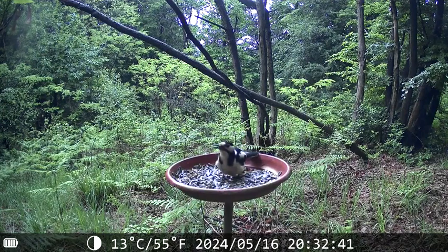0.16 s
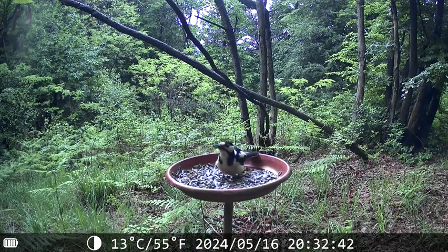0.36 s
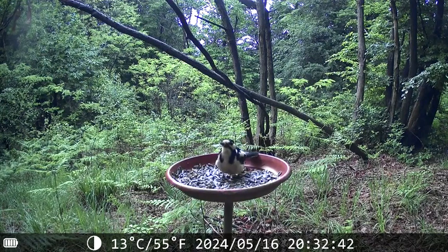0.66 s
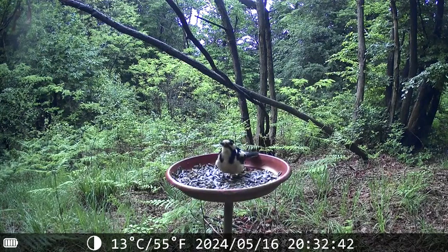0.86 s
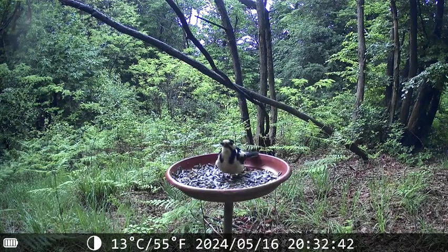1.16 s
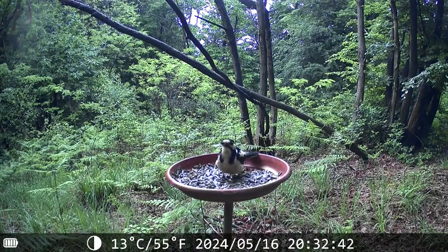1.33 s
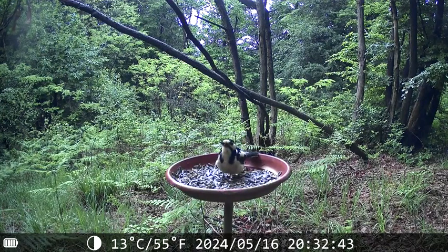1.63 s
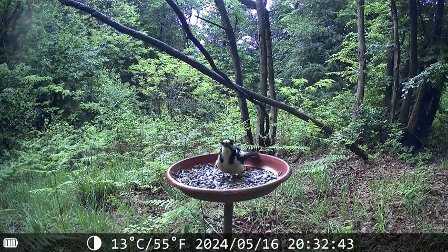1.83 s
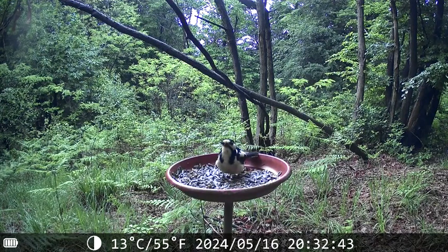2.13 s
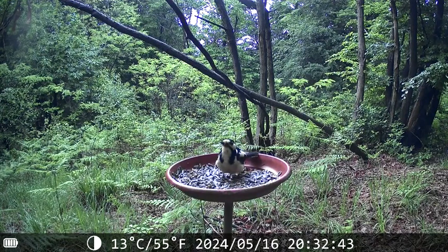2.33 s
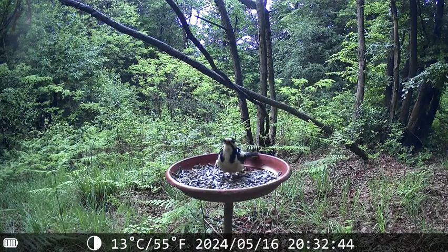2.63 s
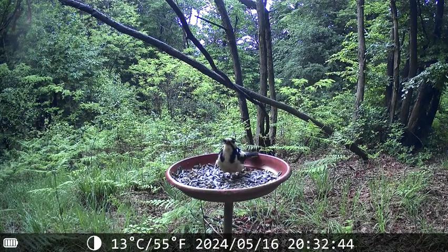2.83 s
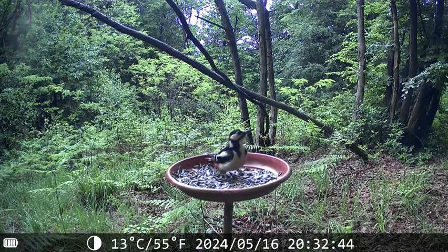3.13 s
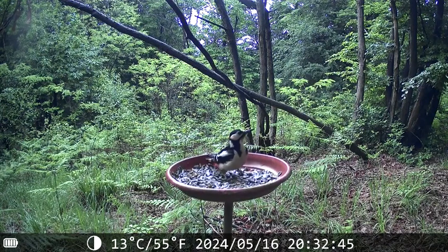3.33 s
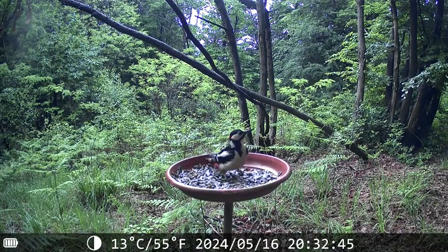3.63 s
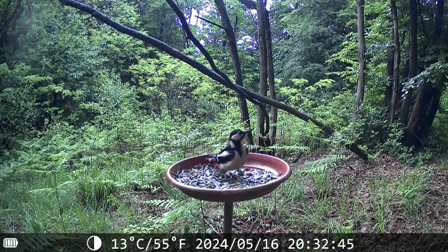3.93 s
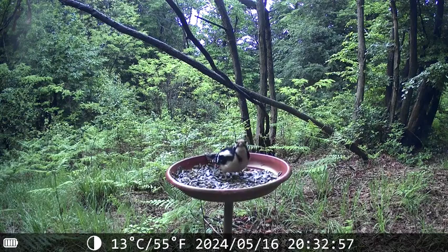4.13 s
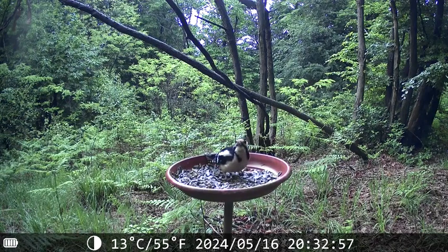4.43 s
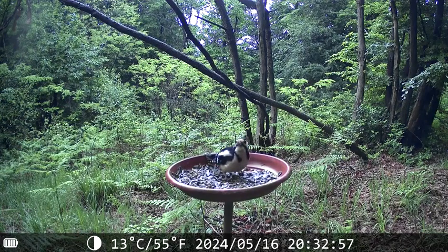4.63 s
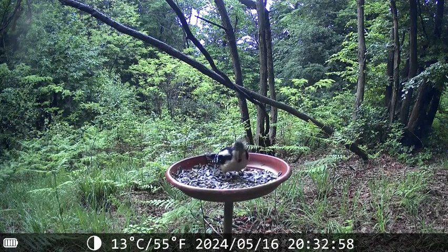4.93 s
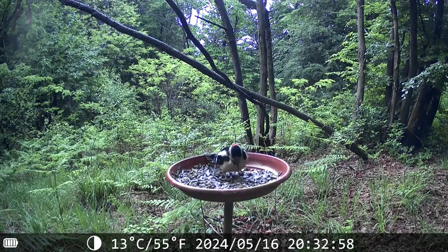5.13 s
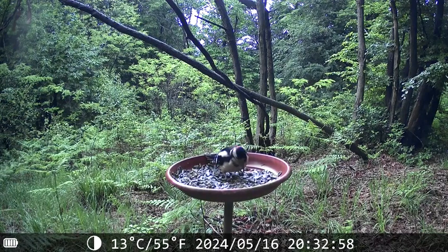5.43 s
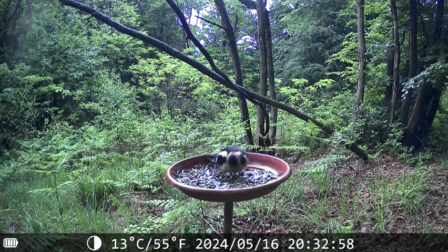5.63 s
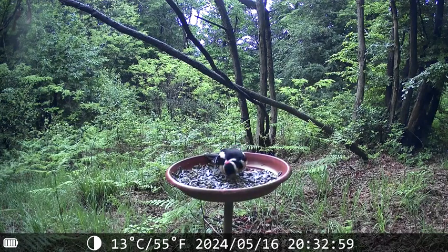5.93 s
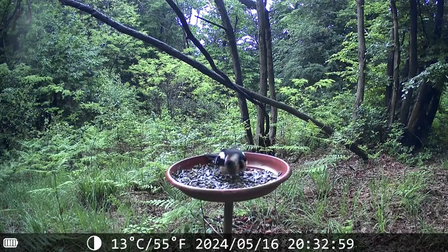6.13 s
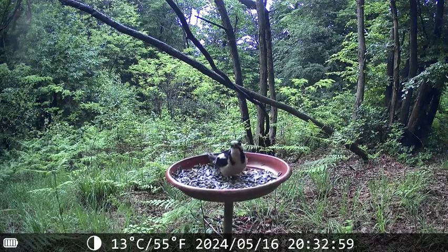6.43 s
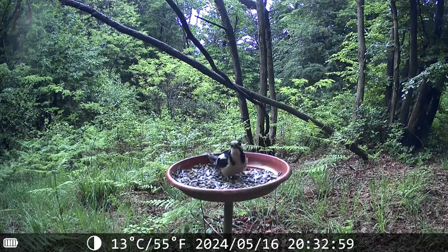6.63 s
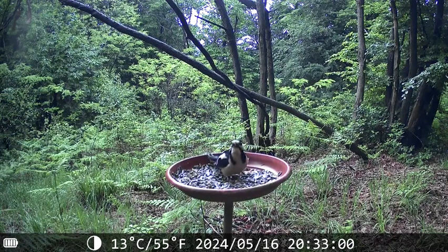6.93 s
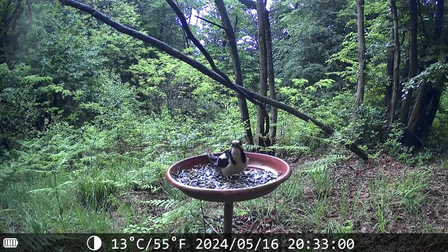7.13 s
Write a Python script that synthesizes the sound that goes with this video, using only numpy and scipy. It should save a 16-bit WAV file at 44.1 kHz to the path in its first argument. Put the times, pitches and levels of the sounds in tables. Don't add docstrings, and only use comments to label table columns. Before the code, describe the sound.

A low, steady hiss of leaves and microphone circuitry runs through a quiet wood. In the first half second a woodpecker shuffles on a clay dish: small dry husk clicks and scrapes with a faint ceramic ring, and a barely audible distant bird note. Tiny scuffs come around 1.3 to 2.2 s, otherwise just hiss. At about 3.1 s the bird gives one extremely short, loud, piercing call, distorted by overload, with a brief echo from the trunks and a little scuff just after. Hiss continues until 3.7 s, then absolute silence until 4.4 s. Hiss returns abruptly with a faint, fading wash of echo. A click precedes a second sharp call at 5.0 s, with less distant echo. From 6.1 s far-off birds give soft, husky falling whistles, while louder seed scuffs and clicks cluster at 6.4 to 6.6 s. Whistles continue to the end, about 7.3 s. Mono, dull on top.

```python
import sys
import numpy as np
from scipy import signal
from scipy.fft import rfft, irfft, next_fast_len
from scipy.io import wavfile
from scipy.ndimage import uniform_filter1d

SR = 44100
rng = np.random.default_rng(int(sys.argv[2]) if len(sys.argv) > 2 else 0)


def elevation(decibels):
    levels = np.asarray(decibels, float)
    return 10 ** (levels / 20)


def log_audio(samples):
    frames = np.atleast_2d(samples).T
    limited = np.clip(frames, -1, 1)
    pcm = np.round(limited * 32767).astype(np.int16)
    wavfile.write(sys.argv[1], SR, pcm)


N = 320607

# from t/s, to t/s
SILENCE = (3.742, 4.399)


def unit(x):
    return x / np.sqrt(np.mean(x ** 2) + 1e-20)


def along(points, hz):
    f, v = np.transpose(points)
    return np.interp(np.log(hz + 1), np.log(f + 1), v)


def filtered(x, response):
    m = next_fast_len(N + SR // 2)
    return irfft(rfft(x, m) * response(np.fft.rfftfreq(m, 1 / SR)), m)[:N]


def modes(table):
    def response(f):
        total = 0
        for k, (c, w, db) in enumerate(table):
            total = total + (-1) ** k * elevation(db) * 1j * f * w / (c * c - f * f + 1j * f * w)
        return total
    return response


def add(track, s, sound):
    part = track[round(s * SR):][:len(sound)]
    part += sound[:len(part)]


def scatter(sound):
    # f/Hz, t60/s
    wood = [(1000, 0.18), (2500, 0.2), (4000, 0.39), (4700, 0.37), (7000, .25)]
    hz, t, z = signal.stft(rng.standard_normal(SR // 2), SR, nperseg=256)
    decay = elevation(-60 * t / along(wood, hz)[:, None])
    tail = signal.istft(z * decay, SR, nperseg=256)[1]
    return signal.fftconvolve(sound, tail / np.linalg.norm(tail))


def air():
    # f/Hz, level/dB per Hz
    hiss_spectrum = [(20, -36), (64, -19), (173, -10), (500, -0.5), (1440, -7.5), (4070, -11.5),
                     (6500, -14), (7300, -32)]
    level_db, patch_db = -67.5, 1.3
    z = signal.stft(rng.standard_normal(N), nperseg=1024)[2]
    field = uniform_filter1d(rng.standard_normal(z.shape), size=3, axis=0)
    field = uniform_filter1d(field, size=4, axis=1)
    patchy = signal.istft(z * elevation(patch_db * unit(field)), nperseg=1024)[1][:N]
    return elevation(level_db) * unit(filtered(patchy, lambda hz: elevation(along(hiss_spectrum, hz))))


def seeds():
    # t/s, hold/s, level/dB, low ring/dB, high ring/dB
    shuffle = [(0.056, .028, -66.5, -9, -6), (0.258, 0.016, -74.5, -1.5, -8), (0.337, 0.011, -66, -4, -6),
               (0.385, 0.035, -70, -2, 4), (0.432, 0.022, -75, -11, -8), (0.48, 0.0036, -71, 1, -7),
               (0.498, 0.004, -57, -11, 1.5), (.514, 0.015, -63, -3, -15), (1.323, .01, -80, -4, 7),
               (1.403, 0.011, -83, 0, 11), (1.76, .008, -72, -3, -4), (2.206, .008, -70.5, -9, -11),
               (2.23, .03, -83, -3, -7), (3.189, 0.0071, -58.5, -9, 6), (6.37, 0.014, -55, -10.5, 4.5),
               (6.392, 0.028, -62, -17, 0), (6.451, 0.052, -50.5, -3.5, -6.5),
               (6.567, 0.027, -56.5, -6, -5), (6.598, 0.015, -49.5, -6.5, -1.5)]
    # f/Hz, width/Hz, level/dB
    dishes = [
        [(970, 250, -15.5), (1566.4, 230, 0.5), (2310, 250, 3), (3180, 400, 1), (3720, 690, 0), (4050, 220, 8),
         (4750, 530, -4)],
        [(996, 114, -6), (1452, 95, -3.7), (1760, 410, -5), (2313, 150, 2), (2790, 250, 1.5), (3270, 270, 1.9),
         (3730, 150, 2), (4050, 230, 1.5), (4790, 710, -2.5)],
    ]
    # t/s, peak level/dB, f/Hz
    ticks = [(0.0484, -51, 3500), (0.3324, -58, 4000), (0.3433, -58, 3130), (0.377, -46, 4030),
             (0.404, -45, 4020), (0.4968, -59, 3950), (4.9397, -49.5, 4250), (6.37, -47, 4000)]
    grain_db = 2.8
    scuff_db_per_s, trickle_db_per_s = 2603, 894

    t, out = np.arange(N) / SR, np.zeros(N)
    sizes = elevation(grain_db * rng.standard_normal(N // 90 + 1)).repeat(90)[:N]
    grains = rng.standard_normal(N) * sizes

    def rung(part):
        body = modes(part)
        return unit(filtered(grains, lambda hz: body(hz) ** 2 + 0.19 * body(hz)))

    rings = [[rung(part) for part in (dish[:2], dish[2:-2], dish[-2:])] for dish in dishes]
    for s, hold, db, low_db, high_db in shuffle:
        low, mid, high = rings[int(s > SILENCE[0])]
        loss_db = scuff_db_per_s * np.maximum(s - t, 0)
        loss_db += trickle_db_per_s * np.maximum(t - s - hold, 0)
        out += elevation(db - loss_db) * (mid + elevation(low_db) * low + elevation(high_db + 2.0) * high)

    for s, db, hz in ticks:
        snap = elevation(-60 * t[:SR // 30] / 0.012) * rng.standard_normal(SR // 30)
        husk = signal.iirpeak(hz, 4.2, fs=SR)
        ring = signal.lfilter(*husk, signal.lfilter(*husk, snap))
        add(out, s, elevation(db - 1.0) * ring / np.abs(ring).max())
    return out


def songbirds():
    # t/s, length/s, start f/Hz, end f/Hz, level/dB
    sweeps = [(6.138, 0.096, 5460, 4050, -57.5), (6.455, 0.12, 5950, 4627, -51.5),
              (6.79, 0.034, 6270, 5380, -69.5), (6.793, 0.081, 6190, 3410, -62),
              (7.135, 0.114, 5170, 4066, -49.5)]
    # t/s, length/s, f/Hz, level/dB
    notes = [(.435, 0.048, 2190, -76), (.585, 0.087, 2300, -70.5), (5.83, .022, 4050, -69),
             (6.905, 0.046, 4160, -67.5), (7.1, .022, 3150, -74), (7.193, .06, 3760, -58),
             (7.145, 0.054, 4540, -73), (7.205, 0.043, 4620, -60), (6.6, 0.088, 408, -73),
             (6.7, 0.072, 440, -68.5), (6.835, 0.03, 508, -66.5), (6.975, 0.015, 823, -61),
             (7.215, 0.033, 829, -63)]
    settle_s_per_octave = .02
    note_start, note_settle = 1.04, 0.49
    flutter_share = 0.014

    out = np.zeros(N)
    song = [(*row, settle_s_per_octave * np.log2(row[2] / row[3])) for row in sweeps]
    song += [(s, length, note_start * hz, hz, db, note_settle * length) for s, length, hz, db in notes]
    for s, length, start_hz, end_hz, db, glide_s in song:
        t = np.arange(round(length * SR)) / SR
        flutter = unit(uniform_filter1d(rng.standard_normal(SR // 4), size=150))[:len(t)]
        pitch_hz = end_hz + (start_hz - end_hz) * np.exp(-t / glide_s)
        pitch_hz += flutter_share * end_hz * flutter
        swell = np.sin(np.pi * t / length) ** 0.62
        note = elevation(db + 6.5) * swell * np.sin(2 * np.pi * np.cumsum(pitch_hz) / SR)
        echo = scatter(note)
        add(out, s, 0.4 * note)
        add(out, s, elevation(-0.5 - 70 * np.arange(len(echo)) / SR) * echo)
    return out


def arch_of(t):
    half_s, sag = .0105, .125
    catch_share, catch_s = .47, .0017
    slack_share, slack_s, rest_s, sink_per_s = .49, 0.0034, 0.011, 13
    droop_db, push_db, push_from = 6, 5, 0.61
    bloom_db, bloom_s = 5, .002
    onset_db, onset_s = 18, 0.0018
    swell_db_per_s, lead_s = 1800, .011
    cut_db, cut_s, fade_db_per_s = 10.5, .002, 999.5

    u = np.clip(t / half_s, -1, 1)
    early, late = np.maximum(-t - half_s, 0), np.maximum(t - half_s, 0)
    share = 1 - sag * u ** 2
    share -= (1 - sag - catch_share) * (1 - np.exp(-early / catch_s))
    share -= (1 - sag - slack_share) * (1 - np.exp(-late / slack_s))
    share -= sink_per_s * np.maximum(late - rest_s, 0)

    held_db = push_db * np.clip((u - push_from) / (1 - push_from), 0, 1) - droop_db * u / 2
    held_db -= bloom_db * np.exp(-(u + 1) * half_s / bloom_s)
    ends_db = onset_db * np.minimum(early / onset_s, 1)
    ends_db += swell_db_per_s * (early + 3 * np.maximum(early - lead_s, 0))
    ends_db += cut_db * np.minimum(late / cut_s, 1) + fade_db_per_s * late
    return np.maximum(share, .1), held_db - ends_db


def woodpecker():
    # centre t/s, top pitch f/Hz, level/dB, stretch, far echo/dB
    calls = [
        (3.0893, 2273, 3.5, 1.03, -0.5),
        (5.0115, 2401, 0.5, 1.05, -19),
    ]
    # multiple, level/dB
    overtones = [(2, -0.81), (3, -32.5)]
    # f/Hz, width/Hz, level/dB
    throat = [(1310, 275, -8), (2540, 906, -6), (4166, 1184, -0.83)]
    # delay/s, t60/s, level/dB
    trunks = [(.007, .02, -17), (.015, .03, -26), (.026, .1, -33)]
    # delay/s, t60/s, level/dB
    far_trunk = (0.117, 0.19, -44.5)
    # f/Hz, level/dB
    sideways = [(800, 5.5), (2400, 7), (3300, 7), (3900, -1.5), (4600, 2.5), (6000, -2)]

    direct, echoes = np.zeros(N), np.zeros(N)
    t = np.arange(-SR // 20, SR // 20) / SR
    bark_t = np.arange(SR // 10) / SR
    for s, top_hz, db, stretch, far_db in calls:
        share, effort_db = arch_of(t / stretch)
        first_db, rasp_db, thin_db = -12 - 2.1 * db, -11 + 2.92 * db, 8.5 - 1.7 * db
        pitch_hz = uniform_filter1d(top_hz * share, size=40)
        phase = 2 * np.pi * np.cumsum(pitch_hz) / SR
        arch = np.clip((pitch_hz / top_hz - .6) / .3, 0, 1)
        voice = elevation(first_db * arch - 3.5) * np.sin(phase)
        voice += elevation(-30.5) * rng.standard_normal(len(t))
        lost_db = (thin_db + 13.5 * (t < 0)) * (1 - arch)
        for k, level_db in overtones:
            voice += elevation(level_db - lost_db) * np.sin(k * phase)
        call = elevation(db + effort_db) * voice

        rasp = elevation(db + rasp_db + 2500 * (t + .011)) * (t < -.012)
        rasp *= np.clip((t + .027) / .008, 0, 1) ** 2
        breath = signal.lfilter(*signal.iirpeak(3900, 2.8, fs=SR), rng.standard_normal(len(t)))
        add(direct, s + t[0], call + rasp * breath)

        for delay, t60, echo_db in [*trunks, np.add(far_trunk, (0, 0, far_db))]:
            bark = rng.standard_normal(SR // 10) * elevation(-60 * bark_t / t60)
            echo = signal.fftconvolve(call, bark / np.linalg.norm(bark))
            add(echoes, s + t[0] + delay, elevation(echo_db) * echo)
        add(echoes, s + t[0] + 0.013, elevation(-35.5) * scatter(call))
    off_axis = filtered(echoes, lambda hz: elevation(along(sideways, hz)))
    return filtered(direct + off_axis, modes(throat))


def fading_echo():
    # f/Hz, level/dB per Hz
    fading = [(700, -24), (1000, -7.5), (3200, -12), (3800, 1), (4600, -1), (5500, -7.5), (6300, -1.5),
              (7000, -32.5)]
    t = np.arange(N) / SR
    echo = unit(filtered(rng.standard_normal(N), lambda hz: elevation(along(fading, hz))))
    decay = elevation(-64 - 60 * np.abs(t - SILENCE[1]) / 3.1)
    return echo * decay * (t > SILENCE[0])


def scene():
    return (air() + seeds() + songbirds() + woodpecker() + fading_echo())[None]


def clip(x, top, knee):
    return x / (1 + np.abs(x / top) ** knee) ** (1 / knee)


def smear(x, db, skirt_db):
    power = np.abs(signal.stft(x, nperseg=256)[2]) ** 2
    error = signal.stft(rng.standard_normal(len(x)), nperseg=256)[2]
    near, wide = [np.sqrt(np.abs(uniform_filter1d(power, size=bins, axis=0))) for bins in (10, 80)]
    mask = elevation(db) * near + elevation(skirt_db) * wide
    return x + signal.istft(mask * error / np.std(error), nperseg=256)[1][:len(x)]


def band_limit(x):
    return signal.sosfilt(signal.butter(12, 16440, fs=SR, output="sos"), x)


def record(dry):
    slow = signal.resample_poly(dry[0], 160, 441)
    slow = clip(slow, 0.7, knee=33)
    slow = slow + 0.005 * slow ** 2
    slow = smear(slow, db=-24, skirt_db=-32.0)
    fast = signal.resample_poly(slow, 441, 160)[:N]
    fast = filtered(fast, lambda hz: np.clip((7000 - hz) / 250, 0, 1))
    t = np.arange(N) / SR
    gate = np.clip(np.maximum(SILENCE[0] - t, t - SILENCE[1]) / 0.0022, 0, 1)
    return band_limit((gate * clip(fast, 0.72, knee=34))[None])


dry = scene()
out = record(dry)
log_audio(out)
```